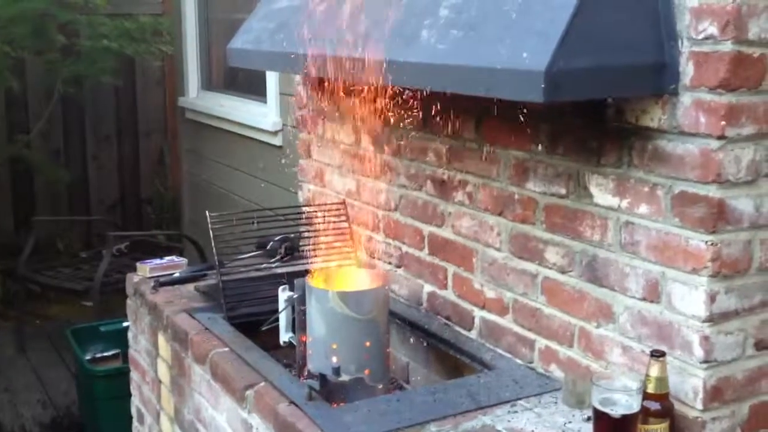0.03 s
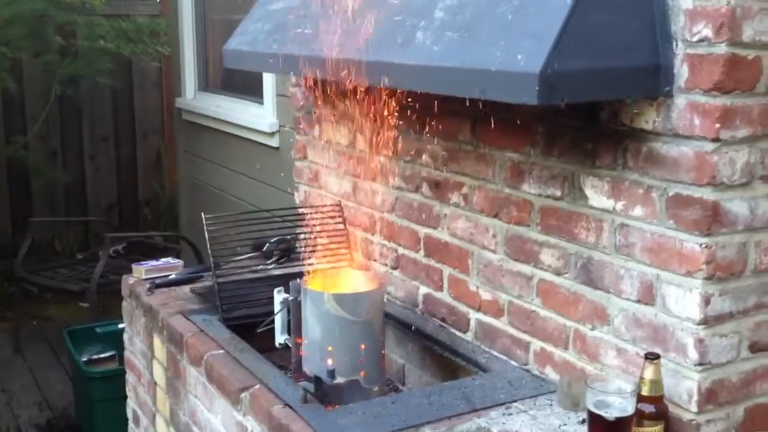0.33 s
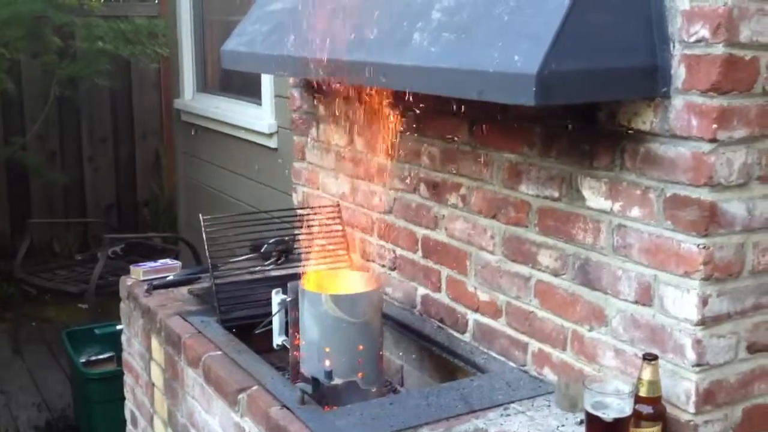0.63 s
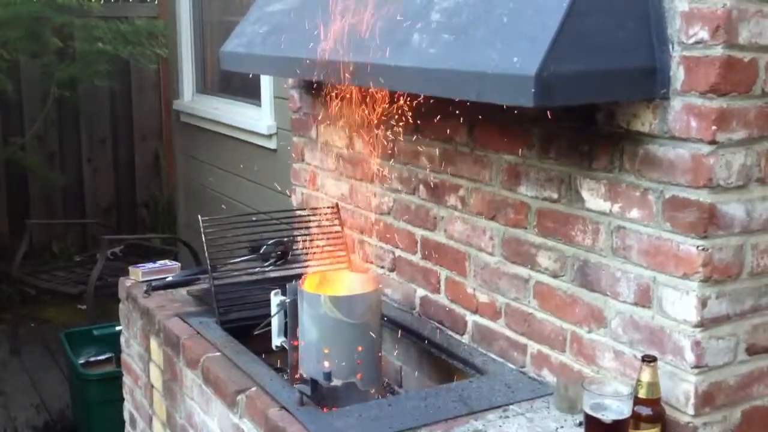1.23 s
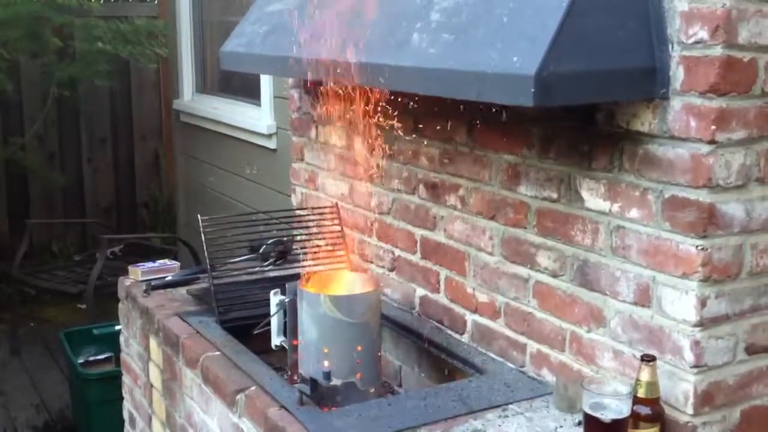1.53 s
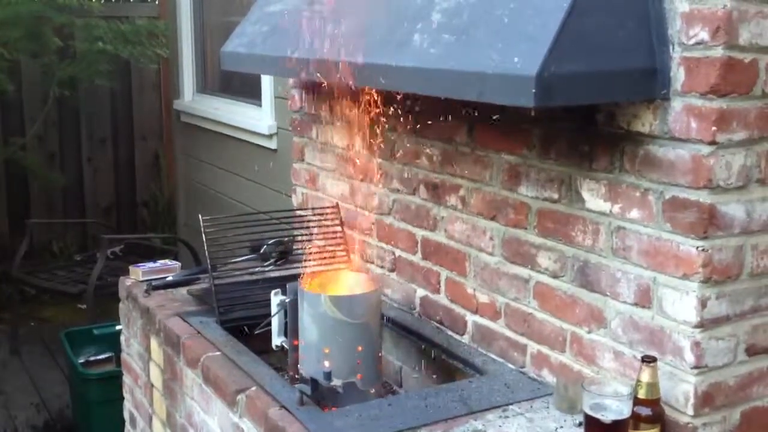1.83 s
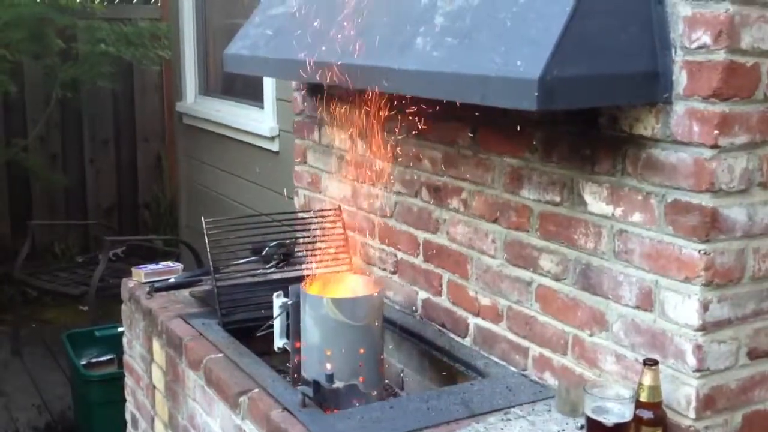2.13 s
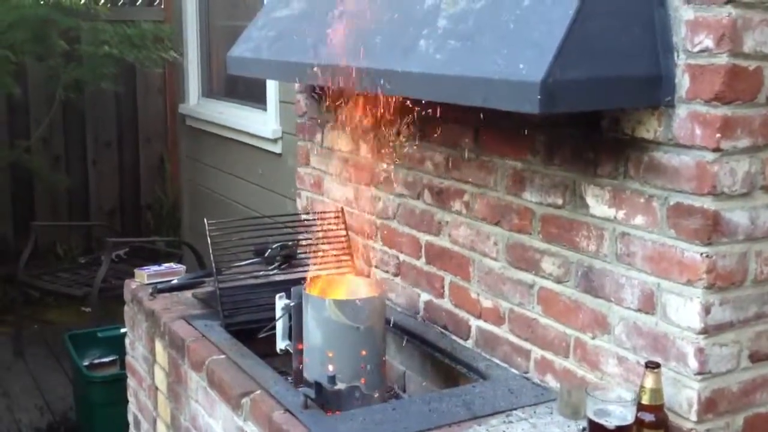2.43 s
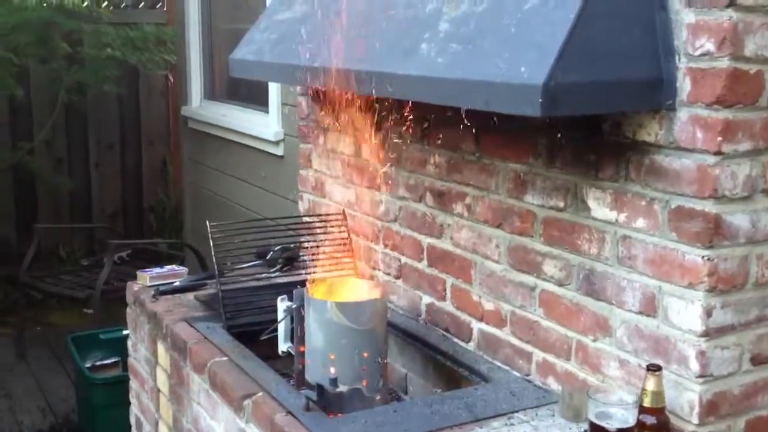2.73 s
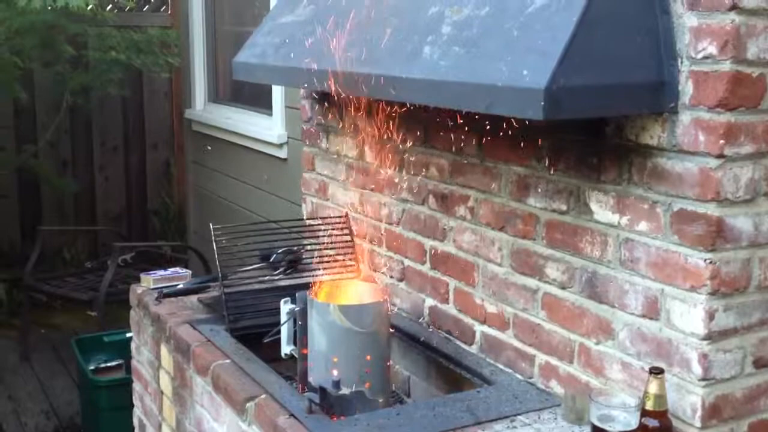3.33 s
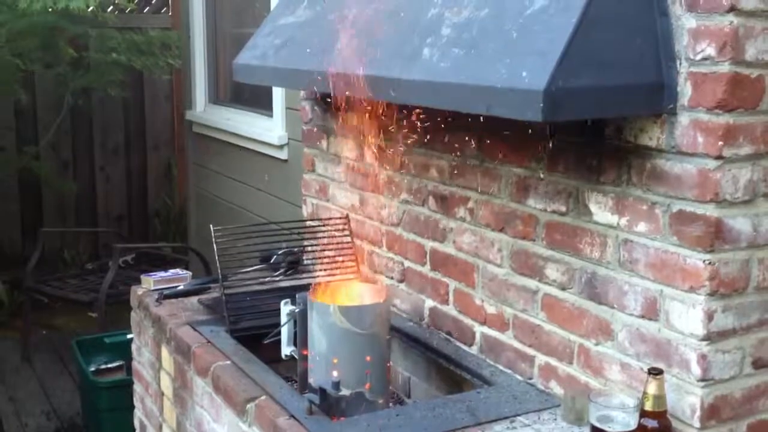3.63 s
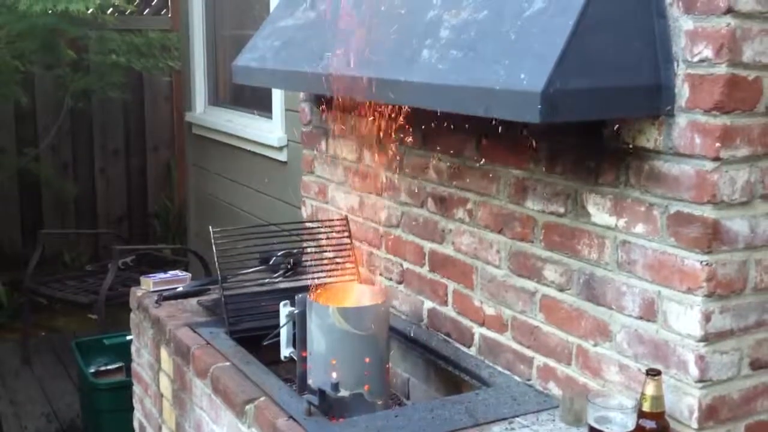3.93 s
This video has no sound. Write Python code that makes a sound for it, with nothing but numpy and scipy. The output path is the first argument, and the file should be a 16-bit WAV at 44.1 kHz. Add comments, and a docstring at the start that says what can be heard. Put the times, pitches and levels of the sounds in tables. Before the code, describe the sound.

Burning charcoal crackles and hisses outdoors, throwing a fine ticking spray of sparks above a faint rush of flame. Around the middle, a loud pop and a smaller one echo briefly off the brick grill, and the sparks thicken near the end.

```python
"""Charcoal catching fire

Charcoal lights in a steel chimney starter on an outdoor brick grill. Escaping gas hisses under a
dense spray of sparks, over a soft flame rumble. Flakes split off with a crackle, and twice a coal
bursts with a sharp pop. The steel can colours it all, and the snaps echo off bricks, hood and yard.
A limiter turns the volume down after the first pop."""
import sys
import numpy as np
from scipy import signal
from scipy.fft import rfft, irfft, next_fast_len
from scipy.io import wavfile
from scipy.ndimage import uniform_filter1d, map_coordinates

SR = 44100
rng = np.random.default_rng(int(sys.argv[2]) if len(sys.argv) > 2 else 0)


def bounce(signal):
    """Save signal as a 16-bit WAV file at the path given by the first command-line argument."""
    frames = np.transpose(np.atleast_2d(signal))
    limited = np.clip(frames, -1, 1)
    pcm = np.round(limited * 32767).astype(np.int16)
    wavfile.write(sys.argv[1], SR, pcm)


N = 176400

# two sharp pops, then the second one's dull echo off the hood
# (time [s], level [dB], hump centre [Hz], hump width [octaves])
POPS = [(1.9647, 9, 6500, 0.74), (2.4901, 1.8, 4460, 0.76), (2.5046, -15, 1010, 0.68)]
# tone of a pop under its hump (frequency [Hz], level [dB])
POP_COLOUR = [(40, -38), (140, -26), (300, 3), (550, 2), (1000, 3), (1700, 12.5), (2350, 11.5), (3200, 7.5),
              (9000, 2), (11000, 5.5), (15000, 7)]
# flakes splitting off (time [s], level [dB], treble tilt [dB per octave])
CRACKLES = [(.0062, -10, 2.5), (0.0457, -12, 3), (0.0594, -14, -2.5), (0.144, -7.5, 10), (0.1843, -11.5, 5),
            (0.2467, -7.5, 5.5), (0.3098, -8.5, 3), (0.399, -6.5, 1.5), (0.4069, -14, 2),
            (0.439, -11.5, 4.5), (0.4626, -11.5, 4), (0.4755, -8.5, 5.5), (0.4972, -10.5, 2),
            (0.5543, -11, 4), (0.608, -13.5, 0.5), (0.638, -13, 5), (0.6488, -10.5, 3),
            (0.7938, -13.5, 1.5), (0.8175, -9, 2), (0.8195, -10, -1), (0.8543, -10, 3), (0.8866, -12, 7),
            (1.1173, -11.5, 12), (1.18, -15, 1), (1.199, -12, -1), (1.3024, -13, 0.5), (1.402, -19, -2.5),
            (1.4531, -9, 4.5), (1.492, -11, 3.5), (1.6126, -9, 4), (1.7323, -16, 1.5), (1.883, -9, 2.5),
            (2.085, -12.5, -0.5), (2.2954, -18.5, -1.5), (2.358, -18.5, -2), (2.7308, -16, 4),
            (2.771, -10, 8), (2.7939, -12, 3), (2.943, -15, 2.5), (3.1923, -12.5, -.8), (3.226, -16.5, -1),
            (3.2444, -8.5, .5), (3.2734, -12, 2.5), (3.422, -18, 3), (3.506, -14, 0), (3.6415, -7, 15),
            (3.674, -15, 0), (3.7757, -7.5, 5), (3.846, -8, 9), (3.8978, -13, 4)]
# tone of a breaking flake (frequency [Hz], level [dB])
CRACKLE_COLOUR = [(400, -13), (900, -5), (1800, 0.5), (2600, 1), (4000, 2.5), (7500, 1.5), (10000, -1.5),
                  (15000, -3.5)]
# loudness of the escaping gas (time [s], level [dB])
HISS_LEVEL = [(0, -41), (.4, -41), (.9, -41.5), (1.1, -40.5), (1.5, -41), (1.9, -42), (2.4, -41),
              (2.8, -43), (3.1, -41.5), (3.4, -42.5), (3.6, -40.5), (3.78, -41.5), (3.9, -42), (4, -44.5)]
# tone of the gas (frequency [Hz], level [dB])
HISS_COLOUR = [(200, -37), (500, -14), (900, -12.5), (1900, -11.5), (2600, -9), (3300, -2.5), (4400, -1.5),
               (5150, -1), (5600, -4), (6500, 1.5), (7500, 1.6), (8700, 0), (10000, -2.5), (11800, 1),
               (13600, -2), (15300, -3)]
# loudness of the spray of sparks (time [s], level [dB])
SPARK_LEVEL = [(0, -40.5), (.4, -42), (.8, -40.5), (1.1, -39.5), (1.5, -41), (1.9, -39), (2.4, -43),
               (2.8, -41.5), (3.1, -46), (3.38, -45.5), (3.55, -38.5), (3.66, -36.5), (3.8, -37.5),
               (3.9, -43.5), (4, -40)]
# tone of a spark (frequency [Hz], level [dB])
SPARK_COLOUR = [(200, -58), (900, -14.5), (2000, -23.5), (4000, -4), (5500, -6.5), (7600, 1.5), (8700, 3),
                (10000, -3), (12000, 1.5), (13600, 1.5), (15300, 1.5)]
# tight clusters of sparks (time [s], length [s], level [dB])
SPUTTERS = [(0.964, 0.026, -43.5), (1.195, 0.023, -46.5), (2.761, .05, -44.5), (3.777, .034, -42.5),
            (3.841, .018, -42), (3.885, 0.022, -48.5)]
# gas singing in cracks (time [s], length [s], pitch [Hz], width [Hz], level [dB])
JETS = [(3.688, 0.089, 2770, 180, -55), (3.742, 0.081, 1650, 400, -51)]
# loudness of the flame (time [s], level [dB])
FLAME_LEVEL = [(0, -56.5), (.55, -56.5), (1.05, -57.5), (1.45, -57), (1.8, -57.5), (2.05, -57.5),
               (2.5, -58), (3.2, -57.5), (3.45, -55), (3.7, -57), (4, -58.5)]
# tone of the flame (frequency [Hz], level [dB])
FLAME_COLOUR = [(25, -35), (55, -46), (80, -19), (100, -14.5), (125, 0.5), (175, -0.5), (215, -0.5),
                (280, -1), (460, -4), (560, -6), (1200, -7), (1800, -15.5), (4000, -21.5)]
# loudness of the air drawn up through the coals (time [s], level [dB])
DRAUGHT_LEVEL = [(0, -49), (.5, -50), (1.45, -50), (1.8, -51), (2.15, -50), (2.65, -49.5), (2.9, -55),
                 (3.2, -51), (3.58, -58), (3.8, -49.5), (3.9, -47.5), (4, -57)]
# tone of that air (frequency [Hz], level [dB])
DRAUGHT_COLOUR = [(250, -47), (520, -2.5), (750, -5.5), (1200, -0.5), (1500, 2.5), (1900, 3.5), (2100, 2.5),
                  (2600, -1), (4500, -7.5), (9000, -4.5)]
# notes at which the air rings in the can and brick pit (frequency [Hz], width [Hz], level [dB])
CAN_RESONANCES = [(215, 24, -9), (470, 26, -9), (700, 47, -6), (802, 70, 1), (836, 34, -8), (962, 33, 1.5),
                  (1082, 65, 3), (1198, 21, 4), (1283, 104, -7), (1644, 30, -10), (1810, 42, -6),
                  (2292, 38, -1), (2475, 87, -5.5), (2627, 240, 0.5), (2905, 100, -5), (3860, 290, -9),
                  (4510, 220, -14), (4630, 37, 3), (5680, 280, -6), (7300, 91, -20)]
# echoes from the can's mouth, far wall and rim (delay [s])
CAN_ECHO_DELAYS = [.0006, .00095, .00122]
# their strengths; the open mouth flips the wave upside down (gain [ratio])
CAN_ECHO_GAINS = [-.3, .62, .22]
# tone of the echoes around the grill (frequency [Hz], level [dB])
ECHO_COLOUR = [(200, 1), (850, 1.5), (1900, -3.5), (3500, -3.5), (7500, 0.5), (12000, -1), (15000, -3)]


def pops():
    """Twice a coal bursts with a sharp pop; the second is followed by a dull echo off the hood."""
    out = np.zeros(N)
    for start, db, hz, octaves in POPS:
        hump = lambda f: np.exp(-(np.log2((f + 1) / hz) / octaves) ** 2)
        colour = lambda f: hump(f) + amp(-12.5) * gain_at(POP_COLOUR, f)
        snap = fracture(colour, splinter_db=-1.5, splinter_fade_s=.005)
        add(out, start, amp(db) * echo(snap, echo_db=-4.5, scatter=.01))
    return out


def crackles(pivot_hz=5000, low_cut_hz=130, trim_db=-.67):
    """Small flakes split off, some dull and some bright, all too small to make bass."""
    out = np.zeros(N)
    for start, db, tilt in CRACKLES:
        brightness = lambda f: amp(2 * tilt * np.tanh(np.log2((f + 1) / pivot_hz) / 2))
        bass_cut = lambda f: (f + 1) ** 2 / (f ** 2 + low_cut_hz ** 2)
        colour = lambda f: gain_at(CRACKLE_COLOUR, f) * brightness(f) * bass_cut(f)
        snap = fracture(colour, splinter_db=6, splinter_fade_s=.0055)
        add(out, start, amp(db + trim_db) * echo(snap, echo_db=-3, scatter=.15))
    return out


def hiss(flutter_db=.82):
    """Gas escapes from the coals with a quickly fluttering hiss."""
    return noise(HISS_COLOUR) * amp(curve(HISS_LEVEL) + flutter_db * wobble(per_s=53))


def sparks(per_s=1100, spread_db=2, max_db=11, spit_db=-1):
    """Countless tiny sparks fly, each a tick and a short spit of noise."""
    sizes = amp(np.minimum(spread_db * rng.standard_normal(N), max_db))
    ticks = (rng.random(N) < per_s / SR) * sizes * rng.choice([-1, 1], N)
    spit_power = signal.fftconvolve(ticks ** 2, burst(fade_s=.0086) ** 2)[:N]
    spit = np.sqrt(np.abs(spit_power)) * rng.standard_normal(N)
    one_spark = click(lambda f: gain_at(SPARK_COLOUR, f))
    spray = signal.fftconvolve(ticks + amp(spit_db) * spit, one_spark)[:N]
    return amp(curve(SPARK_LEVEL)) * unit(spray)


def sputters():
    """A crumbling flake fizzes for a few hundredths of a second."""
    loudness = sum(amp(db) * np.sqrt(swell(start, length)) for start, length, db in SPUTTERS)
    return loudness * noise(CRACKLE_COLOUR)


def jets():
    """As the fire flares, thin jets of gas whistle hoarsely for a moment."""
    out = np.zeros(N)
    for start, length, hz, width, db in JETS:
        whistle = filtered(rng.standard_normal(N), lambda f: 1 / (1 + ((f - hz) / width) ** 2) ** 2)
        out += amp(db) * unit(whistle) * swell(start, length)
    return out


def flame(flicker_db=-.2):
    """The flame rumbles softly, with a slight flicker."""
    return eddies(FLAME_COLOUR) * amp(curve(FLAME_LEVEL) + flicker_db * wobble(per_s=5.7))


def draught():
    """Air rushes up through the coals."""
    return eddies(DRAUGHT_COLOUR) * amp(curve(DRAUGHT_LEVEL))


def fracture(colour, splinter_db, splinter_fade_s):
    """The sound of breaking coal: a click and a brief spray of splinters."""
    snap = amp(splinter_db) * burst(splinter_fade_s, size=2000)
    snap[0] += 1
    snap = flatten_tone(np.pad(snap, (31, 0)))  # room for a soft start
    return np.convolve(snap, click(colour))


def eddies(colour, depth_db=1.8, width_hz=60, life_s=.16):
    """Swirling air: noise in which narrow bands of pitch swell and fade."""
    hz, t, bands = signal.stft(noise(colour), SR, nperseg=2048)
    swirl = uniform_filter1d(rng.standard_normal(bands.shape), round(width_hz / hz[1]), axis=0)
    swirl = uniform_filter1d(swirl, round(life_s / t[1]), axis=1)
    _, air = signal.istft(bands * amp(depth_db * unit(swirl)), SR, nperseg=2048)
    return unit(air[:N])


def can_ringing(f):
    """Gain at each frequency as the air rings in the steel can and the brick pit."""
    return 1 + sum(amp(db) * 1j * f * width / (hz * hz - f * f + 1j * f * width)
                   for hz, width, db in CAN_RESONANCES)


def echo(sound, echo_db, scatter):
    """A snap arrives directly and bounces off the can, bricks, hood and yard."""
    rim_s = CAN_ECHO_DELAYS[-1]
    bricks = burst(fade_s=.047, delay_s=rim_s)
    hood = amp(-13) * burst(fade_s=.017, delay_s=.0148)
    yard = amp(1) * burst(fade_s=.2, delay_s=rim_s)
    tone = click(lambda f: gain_at(ECHO_COLOUR, f))
    paths = amp(echo_db) * signal.fftconvolve(flatten_tone(bricks + hood + yard), tone)
    # delays inside the can vary with where the coal lies
    delays = CAN_ECHO_DELAYS * np.exp(scatter * rng.standard_normal(len(CAN_ECHO_DELAYS)))
    gains = np.r_[1, CAN_ECHO_GAINS]  # direct sound first
    for delay, gain in zip(np.r_[0, delays], gains / np.linalg.norm(gains)):
        add(paths, delay, np.array([gain]))
    return signal.fftconvolve(sound, paths)


def amp(db):
    """Turn decibels into a gain."""
    return 10 ** (np.asarray(db) / 20)


def unit(x):
    """Scale to an average (rms) level of 1."""
    return x / np.sqrt(np.mean(x ** 2) + 1e-20)


def gain_at(colour, f):
    """Read a tone table as a gain at frequency f."""
    hz, db = np.transpose(colour)
    return amp(np.interp(np.log(f + 1), np.log(hz + 1), db))


def curve(points):
    """Read a loudness table at every sample."""
    return np.interp(np.arange(N) / SR, *np.transpose(points))


def swell(start, length):
    """One smooth rise and fall."""
    progress = np.clip((np.arange(N) / SR - start) / length, 0, 1)
    return np.abs(np.sin(np.pi * progress))


def wobble(per_s):
    """A smooth curve through per_s random points a second."""
    return map_coordinates(rng.standard_normal(1024), [np.arange(N) * per_s / SR], mode="wrap")


def filtered(x, response):
    """Scale each frequency in x by its response."""
    size = next_fast_len(N + SR // 2)
    return irfft(rfft(x, size) * response(np.fft.rfftfreq(size, 1 / SR)), size)[:N]


def noise(colour):
    """Steady noise shaped by a tone table."""
    return unit(filtered(rng.standard_normal(N), lambda f: gain_at(colour, f)))


def click(colour, size=1024):
    """The sharpest click with the given tone, of energy 1."""
    gains = np.maximum(colour(np.fft.rfftfreq(size, 1 / SR)), 1e-6)
    cepstrum = irfft(np.log(gains))
    # folding this in half packs the energy at the start
    cepstrum[1:size // 2] *= 2
    cepstrum[size // 2 + 1:] = 0
    pulse = irfft(np.exp(rfft(cepstrum)))
    return pulse / np.linalg.norm(pulse)


def burst(fade_s, delay_s=0, size=12000):
    """Noise of energy 1 that starts after a delay and drops 60 dB in fade_s."""
    t = np.arange(size) / SR - delay_s
    x = rng.standard_normal(size) * (t >= 0) * np.exp(-np.log(1000) * np.abs(t) / fade_s)
    return x / np.linalg.norm(x)


def flatten_tone(x):
    """Keep a burst's spread in time but even out its frequencies."""
    spectrum = rfft(x, 2 * len(x))
    x = irfft(spectrum / (np.abs(spectrum) + 1e-12))[:len(x)]
    return x / np.linalg.norm(x)


def add(track, start, sound):
    """Mix a sound into the track at start seconds."""
    part = track[max(round(start * SR), 0):][:len(sound)]
    part += sound[:len(part)]


def scene():
    """Everything sounds from inside the can and takes on its ringing."""
    fire = pops() + crackles() + sputters() + hiss() + sparks() + jets() + flame() + draught()
    return filtered(fire, can_ringing)[None]


def record(dry):
    """A limiter turns down on a loud burst and recovers slowly; the highest treble is cut off."""
    limit_db, recover_db_per_s, top_hz = -13.5, 7, 15300
    window = int(.0023 * SR)
    power = np.abs(uniform_filter1d(dry[0] ** 2, window))
    over_db = np.maximum(10 * np.log10(power + 1e-12) - limit_db, 0)
    recovery_db = recover_db_per_s * np.arange(N) / SR
    dip_db = np.maximum.accumulate(over_db + recovery_db) - recovery_db
    gain = amp(-uniform_filter1d(dip_db, window))
    return filtered(dry[0] * gain, lambda f: f < top_hz)[None]


dry = scene()
out = record(dry)
bounce(out)
```